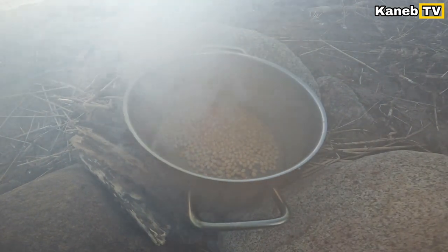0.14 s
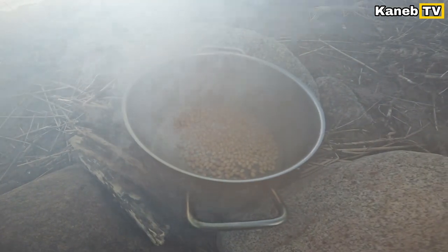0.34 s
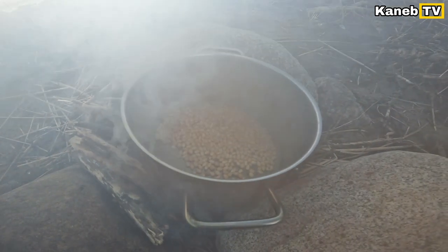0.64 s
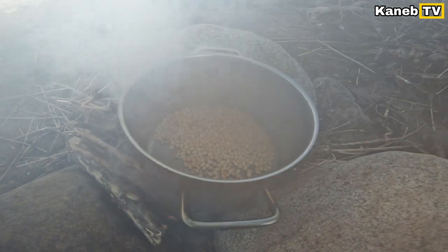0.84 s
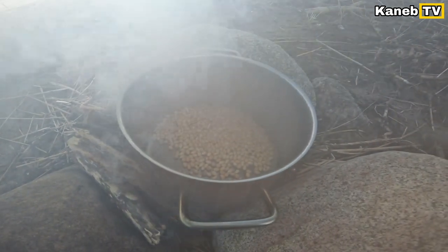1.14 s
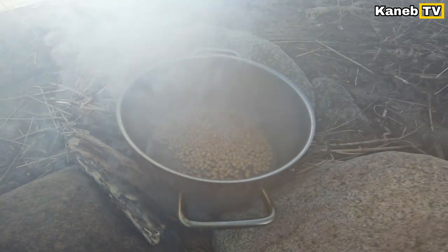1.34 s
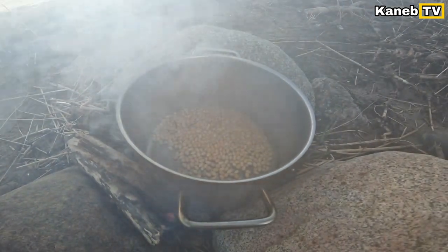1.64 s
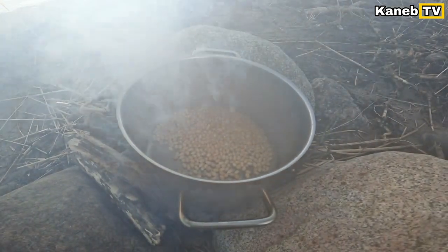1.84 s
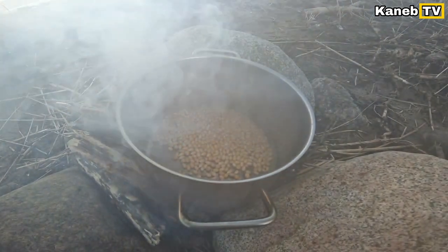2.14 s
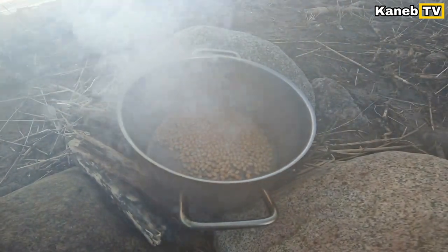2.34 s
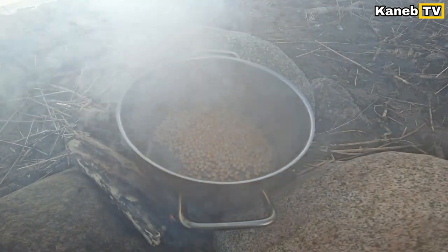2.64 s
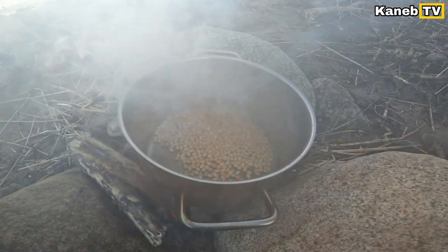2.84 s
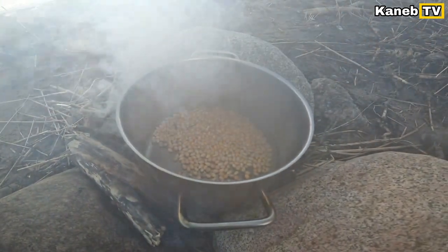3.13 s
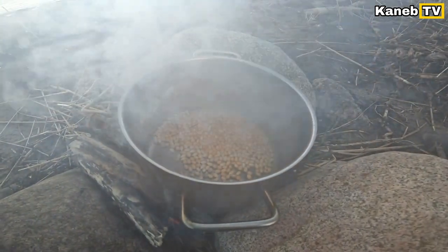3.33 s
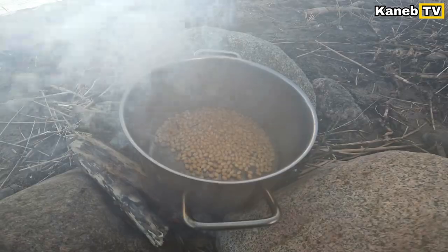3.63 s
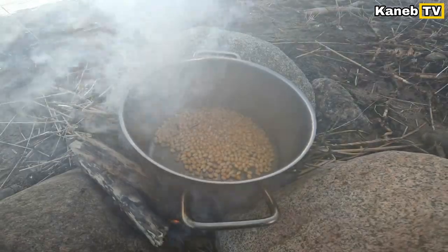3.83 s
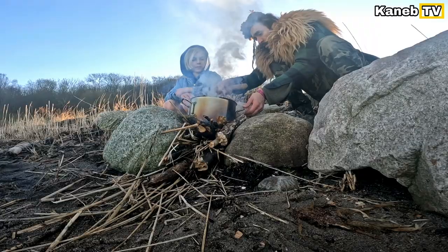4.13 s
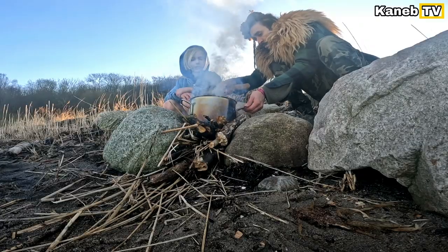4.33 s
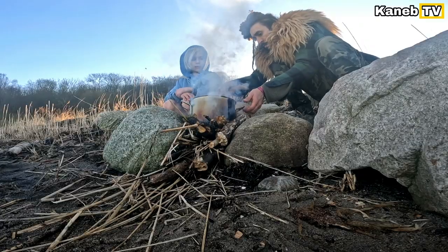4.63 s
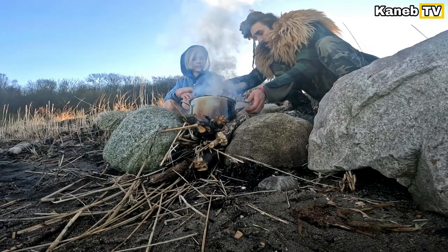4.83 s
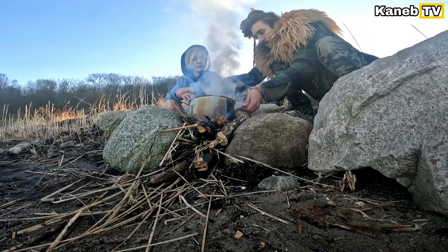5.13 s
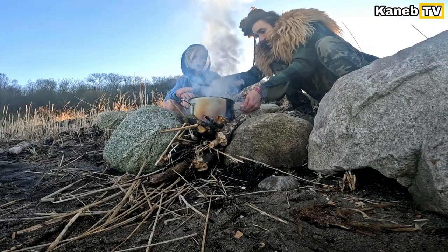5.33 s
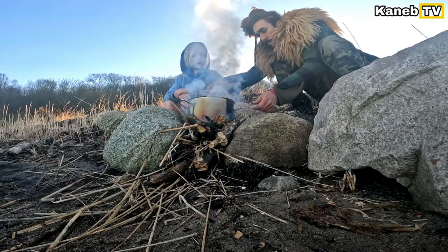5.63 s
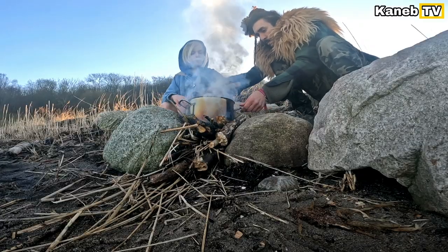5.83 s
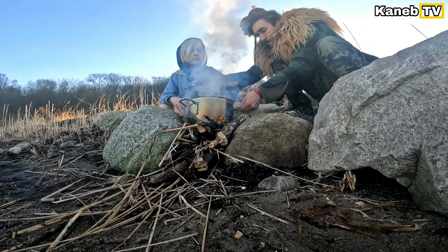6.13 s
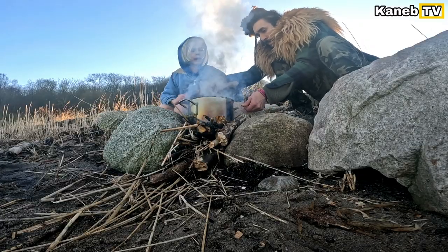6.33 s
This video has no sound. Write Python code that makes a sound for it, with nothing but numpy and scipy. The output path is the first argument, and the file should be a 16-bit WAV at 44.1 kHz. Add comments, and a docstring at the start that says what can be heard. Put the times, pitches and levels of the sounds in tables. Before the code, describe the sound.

From 0 to 4 seconds, food sizzles steadily close to the microphone in an open metal pot: a dense hiss of steam, snapping droplets and tiny ringing bubbles, slightly hollow, swelling a little near 1.3 seconds. Beneath it are a low fluttering campfire and soft wind buffets; small spits and wood cracks tick, notably between 2.1 and 2.8 and near 3.3. Just after 4 seconds the sound moves further off and the sizzle becomes faint, as the pot scrapes with a metallic groan. A light touch follows at 4.3, then a strong clank and squeal at 4.6. Quiet grating continues from 4.8 to 5.3, with slight sizzle flares at 4.5 and 5.3. A stone rocks dully at 5.36, then sharp ringing knocks come at 5.43 to 5.5. After a lull, a short rising croak and knock at 5.98 precede loud clanks and scraping at 6.1 to 6.2, ringing away into faint grating.

```python
"""Sizzling pot on a campfire

Food sizzles in a metal pot: impulses of bursting bubbles, ringing bubbles and steam noise, coloured by the pot.
Wind and flames are low turbulent noise; spits of fat and cracks of firewood are noise in single resonances.
After four seconds the sizzle is heard from further off, and the pot is shoved about on its hearth stones:
each shove is a knock and a run of stick-slip catches that ring the modes of its wall; some slips squeal.
A stone also rocks under the pot, and once the pot judders with a low croak."""
import sys
import numpy as np
from scipy import signal
from scipy.fft import rfft, irfft, next_fast_len
from scipy.io import wavfile
from scipy.ndimage import uniform_filter1d

SR = 44100
rng = np.random.default_rng(int(sys.argv[2]) if len(sys.argv) > 2 else 0)


def unload_audio(sound):
    """Save the sound as a 16-bit wav file, at the path given as the first command line argument."""
    columns = np.transpose(np.atleast_2d(sound))
    # keep every value between -1 and 1, then stretch to whole-number steps
    steps = np.round(np.clip(columns, -1, 1) * 32767)
    wavfile.write(sys.argv[1], SR, steps.astype(np.int16))


N = 285327

# spectrum of wind at the microphone: frequency_hz, relative_density_db (per Hz)
WIND_COLOUR = [(8.8, -31), (15, 2), (43, 0.5), (89, -8), (120, -18), (160, -92), (260, -120)]
# gusts, bell-shaped in power: centre_s, width_s (between the 1/e points), level_db
GUSTS = [(.275, 0.032, -29.5), (0.783, .07, -38), (1.93, 0.08, -30.5), (2.24, 0.38, -36),
         (2.679, 0.034, -27.5), (2.828, 0.053, -38), (3.232, 0.085, -33), (3.495, 0.034, -29)]
# spectrum of the flames: frequency_hz, relative_density_db (per Hz)
FLAME_COLOUR = [(50, -4.5), (90, 0.5), (175, -2), (280, -17.5), (520, -19), (800, -34.5), (1500, -69)]
# spits of fat and cracks of firewood at set times:
# start_s, relative_peak_db, centre_hz, half_width_hz (of one filter pass), noise_t60_s
SPITS = [(.054, -36, 2980, 1200, 0.059), (.84, -50, 530, 250, .036), (1.135, -47, 1330, 120, .035),
         (2.086, -30.5, 10900, 700, 0.015), (2.227, -41.5, 10740, 400, .014),
         (2.299, -35, 4800, 1200, .024), (2.729, -30, 5330, 1490, .02), (2.73, -39, 1800, 900, 0.023),
         (2.817, -40.5, 1400, 400, 0.051), (3.293, -43.5, 314, 90, 0.023), (3.39, -36, 3800, 400, .025),
         (6.436, -44.5, 5930, 1800, .023)]
# spectrum of the near sizzle without the pot's air: frequency_hz, relative_density_db (per Hz)
NEAR_COLOUR = [(500, -17.5), (850, -20), (1100, -10.5), (1620, -10.5), (2150, -8), (2900, -1.5),
               (4200, -2.5), (5000, 1), (7700, -1.5), (8100, -6.5), (9500, -12), (11300, -9.5),
               (13200, -18.5), (14500, -21)]
# spectrum of the distant sizzle: frequency_hz, relative_density_db (per Hz)
FAR_COLOUR = [(300, -7), (700, -10), (1500, 1.5), (3000, 6.5), (5000, 3), (7600, -0.5), (9000, -10.5),
              (12000, -7), (14500, -27.5)]
# shape of the sizzle's stereo width: frequency_hz, relative_side_to_mid_db
FRY_SIDE = [(60, -23), (110, -16), (200, -10), (370, 7), (680, 0), (1250, -9.5), (2290, -6), (4210, -6),
            (7720, -13), (14200, -10)]
# air resonances of the open pot: centre_hz, width_hz (at half the lift), lift_db
CAVITY = [(1273, 132, 13.5), (1932, 95, 11), (2284, 130, 7), (2634, 72, 9), (3200, 74, 6), (3800, 210, 4),
          (10600, 320, 4.5)]
# frying heard from above the pot: time_s, level_db
FRYING = [(0, -47.5), (1.3, -45), (2.4, -46.5), (4, -45)]
# food slides onto hot metal and the sizzle flares: centre_s, width_s (between the 1/e points), level_db
FLARES = [(4.52, 0.23, -54), (5.32, 0.18, -54)]
# strong vibration modes of the pot: frequency_hz, relative_energy_db, t60_s
POT = [(228, -12, .12), (510, -7, .15), (524, -3, .24), (690, -13, .14), (888, -17, .25), (1012, -11, .17),
       (1135, -9, .17), (1215, -13, .55), (1240, -7, .2), (1292, -8, .16), (1437, -16, .3),
       (1674, -24, .65), (1900, -15, .15), (2051, -19, .45), (2315, -20, .7), (2487, -12, .55),
       (2530, -11, .36), (2579, -13, .7), (2660, -6, .37), (2826, -16, .8), (2947, -7, .35), (3008, -7, .3),
       (3111, -4, .3), (3185, -4, .18), (3272, -4, .2), (3762, -11, .25), (3885, -8, .24), (4145, -10, .28),
       (4435, -10, .26), (5730, -16, .18)]
# crowd of weaker modes, also the colour of the contact cracks: frequency_hz, relative_level_db
SHELL = [(70, -2), (160, 0), (320, -8.5), (520, 4.5), (800, -7), (1280, -5), (1620, -13.5), (2200, -13),
         (3250, 3.5), (3700, -4), (4800, -6), (5400, -8), (7900, -13), (9000, -28), (14000, -29)]
# shoves: start_s, drag_length_s, knock_db, drag_db (both before the tilt), swell_db (over the drag),
# bass_tilt_db, treble_tilt_db
SHOVES = [(4.037, 0.033, -34.5, -28.5, 3.5, 2, 2.5), (4.07, 0.05, -36, -19.5, -0.5, 1.5, -9),
          (4.276, 0.052, -43.5, -51, 0, 0, -7), (4.504, .01, -41, -55, 0, -4.5, -24),
          (4.522, 0.011, -43, -59, 0, 0, 15), (4.58, .015, -34.5, -35.5, 0, -2, -9),
          (4.598, 0.046, -23, -22, 2, 1.5, -1.5), (4.792, 0.154, -47, -43.5, -1.5, 1.5, -1.5),
          (4.95, 0.083, -51, -45, 2, 7, -2), (5.124, .12, -49, -41, 5.5, 2.5, -23),
          (5.26, .1, -54, -45.5, 1.5, 5, -15), (5.427, 0.01, -21, -26.5, 0, -1, -7),
          (5.465, 0.052, -26.5, -23, -2, 0.5, 0), (5.981, 0.027, -30, -27, 2.5, 0, 3),
          (6.104, 0.02, -48, -34, -1, 0, .5), (6.132, 0.018, -19, -23.5, 0, -2, -0.5),
          (6.158, 0.068, -28, -22.5, 0, -0.5, -4.5), (6.331, 0.062, -52, -45.5, 0, 7, -13.5)]
# single modes of the pot set ringing, mostly by slips that groan or squeal, some by bumps of the stones:
# start_s, rise_s, pitch_hz, level_db (before panning)
SQUEALS = [(4.061, 0.038, 2660, -27.5), (4.065, 0.013, 526.6, -27), (4.28, 0.0076, 520, -40.5),
           (4.594, 0.0087, 1012, -28.5), (4.6, 0.025, 518.7, -30), (4.6, .013, 1128, -24),
           (4.615, 0.049, 3110, -21.5), (5.225, 0.042, 2660, -46.5), (5.35, .02, 522, -40),
           (5.475, 0.016, 3190, -26), (6.132, .003, 4435, -25.5), (6.133, .065, 3280, -31.5)]

TOP_HZ = 14000
MOVE_S, MOVE_LENGTH_S = 4.07, 0.2  # when the scene changes to a place further from the pot, and how long the crossfade takes
FFT_SIZE = next_fast_len(N)
TIME, FREQ = np.arange(N) / SR, np.arange(FFT_SIZE // 2 + 1) * SR / FFT_SIZE
RING_TIME = np.arange(SR) / SR
AWAY = np.clip((TIME - MOVE_S) / MOVE_LENGTH_S, 0, 1)  # 0 over the pot, 1 further off


def undb(db):
    """Logarithmic level: decibels become an amplitude gain."""
    return 10 ** (np.asarray(db) / 20)


def unit(x):
    """Mean power: scale to an rms of 1."""
    return x / np.sqrt(np.mean(x ** 2) + 1e-24)


def loudest(x):
    """Short-time power: scale so that the loudest 20 ms have an rms of 1."""
    power = np.mean(np.atleast_2d(x) ** 2, axis=0)
    return x / np.sqrt(uniform_filter1d(power, SR // 50).max())


def spectrum(points):
    """Logarithmic frequency: join (Hz, dB) points by straight lines on a log axis."""
    hz, db = np.transpose(points)
    return np.interp(np.log(FREQ + 1), np.log(hz), db)


def colour(x, db):
    """Linear filtering: apply a gain in dB at every frequency."""
    return irfft(rfft(x, FFT_SIZE) * undb(db), FFT_SIZE)[..., :N]


def lowpass_db(corner_hz):
    """Low-pass response in dB, smooth around its corner."""
    return -20 * np.log10(1 + (FREQ / corner_hz) ** 4)


def walk(rate_hz):
    """Random modulation: low-passed noise with an rms of 1."""
    return unit(colour(rng.standard_normal(N), lowpass_db(rate_hz)))


def delay(x, seconds):
    """Interaural lag: a phase shift proportional to frequency."""
    return irfft(rfft(x, FFT_SIZE) * np.exp(-2j * np.pi * FREQ * seconds), FFT_SIZE)[:N]


def add(out, start_s, sound):
    """Superposition: mix a sound in at a time."""
    start = max(int(start_s * SR), 0)
    out[..., start:start + sound.shape[-1]] += sound[..., :N - start]


def fade(t, t60):
    """Exponential free decay, 60 dB in t60 seconds."""
    return np.exp(-np.log(1000) * t / t60)


def steady(near_db, far_db):
    """Level against distance: a gain that only changes while the scene shifts further from the pot."""
    return undb(near_db + (far_db - near_db) * AWAY)


def swells(base, rows):
    """Power addition: bell-shaped swells join a base gain."""
    power = base ** 2
    for centre_s, width_s, db in rows:
        power = power + undb(db) ** 2 * np.exp(-(2 * (TIME - centre_s) / width_s) ** 2)
    return np.sqrt(power)


def bursts(rate_hz, spread_db):
    """Random impulse train: many faint bursts, a few strong."""
    size = undb(spread_db * np.minimum(rng.exponential(size=N), 6))
    happens = rng.random(N) < rate_hz / SR
    return unit(happens * size * rng.choice([-1, 1], N))


def pops(rows):
    """Damped resonance: short noise bursts, each dying away in one broad band."""
    out = np.zeros(N)
    t = RING_TIME[:SR // 5]
    for start_s, peak_db, hz, half_width_hz, t60 in rows:
        band = signal.iirpeak(hz, hz / (2 * half_width_hz), fs=SR)
        burst = rng.standard_normal(len(t)) * fade(t, t60)
        for _ in range(2):
            burst = signal.lfilter(*band, burst)
        add(out, start_s, burst / np.abs(burst).max() * undb(peak_db))
    return out


def rumble(points, gain, side_db, pan_db, puff_db):
    """Turbulence: low noise with sudden small puffs, much alike in both ears."""
    layers = []
    for _ in range(2):
        air = rng.standard_normal(N) + undb(puff_db) * bursts(120, 3.44)
        layers.append(unit(colour(air, spectrum(points))))
    mid, side = layers[0], layers[1] * undb(side_db)
    return np.array([(mid + side) * undb(pan_db), (mid - side) * undb(-pan_db)]) * gain


def wind():
    """Turbulent pressure on the microphone: a wandering breeze with gusts."""
    breeze = steady(near_db=-43.5, far_db=-52) * undb(1.5 * walk(4.8))
    return rumble(WIND_COLOUR, swells(breeze, GUSTS), side_db=-17, pan_db=-1.7, puff_db=-20)


def flames():
    """Turbulent combustion: a fluttering low rumble with many puffs."""
    draught = steady(near_db=-51, far_db=-50) * undb(0.5 * walk(8.4))
    return rumble(FLAME_COLOUR, draught, side_db=-19.5, pan_db=0.0, puff_db=-3.5)


def spits(near_db=-43.5, far_db=-54.5, spread_db=2.5, low_hz=2000, octaves=2.6, width=0.11, t60=.018, count=24):
    """Impulsive sources: spits and cracks at set times, and others scattered in time and pitch."""
    when, pitch, size = rng.random((count, 3)).T
    starts = when * TIME[-1]
    hz = np.minimum(low_hz * 2 ** (octaves * pitch), TOP_HZ)
    db = np.interp(starts, [MOVE_S, MOVE_S + MOVE_LENGTH_S], [near_db, far_db]) + spread_db * (2 * size - 1)
    scattered = [(s, d, f, width * f, t60) for s, d, f in zip(starts, db, hz)]
    return pops(SPITS) * undb(3) + pops(scattered)


def bubbles(rate_hz, spread_db):
    """Bubble resonance: each bubble in the fat rings for a few milliseconds at its own pitch."""
    out, t = np.zeros(N + 256), RING_TIME[:256]
    when, pitch, size = rng.random((int(rate_hz * N / SR), 3)).T[:, :, None]
    hz = 1500 + 12500 * pitch
    level = np.sqrt(hz) * undb(spread_db * np.minimum(-np.log(size), 5))
    rings = np.sin(2 * np.pi * hz * t) * fade(t, t60=t[-1]) * level
    np.add.at(out, (when * N).astype(int) + np.arange(len(t)), rings)
    return unit(out[:N])


def sizzle(shape_db, rate_hz, spread_db, steam_db, bubble_db, side_db=-2.0, lag_s=1.2e-5):
    """Boiling noise: snapping droplets and ringing bubbles over a hiss of steam."""
    layers = []
    for _ in range(2):
        ringing = undb(bubble_db) * bubbles(rate_hz=1200, spread_db=3.5)
        snapping = bursts(rate_hz, spread_db)
        steam = undb(steam_db) * rng.standard_normal(N)
        layers.append(unit(colour(snapping + ringing + steam, shape_db)))
    mid, side = layers[0], colour(layers[1], spectrum(FRY_SIDE) + side_db)
    both = np.array([delay(mid + side, lag_s), mid - side])
    # the fine spray at the top comes and goes apart from the coarser bubbling
    coarse = colour(both, lowpass_db(7000))
    spray = both - coarse
    return coarse * undb(.6 * walk(16)) + spray * undb(1.3 * walk(18))


def frying():
    """Cavity resonance and distance: the sizzle from over the pot's mouth, then faint from the side."""
    cavity_db = sum(lift / (1 + (2 * (FREQ - hz) / width) ** 2) for hz, width, lift in CAVITY)
    near = sizzle(spectrum(NEAR_COLOUR) + cavity_db, rate_hz=6000, spread_db=1.5, steam_db=0.5, bubble_db=-5.5)
    far = sizzle(spectrum(FAR_COLOUR), rate_hz=1100, spread_db=3.0, steam_db=3.5, bubble_db=-1.5)
    near_gain = undb(np.interp(TIME, *np.transpose(FRYING)))
    far_gain = swells(undb(-62), FLARES)
    return near * near_gain * (1 - AWAY) ** 2 + far * far_gain * AWAY


def stones(start_s=5.363, length_s=.05, gap_s=.0175, peak_db=-30, first_hz=240, sag_oct_per_s=4):
    """Repeated impact: a hearth stone rocks in a quick run of bumps, each lower than the last."""
    ages = np.arange(0, length_s, gap_s)
    centres = first_hz * 2 ** (-sag_oct_per_s * ages)
    return pops([(start_s + age, peak_db, hz, 0.38 * hz, 0.11) for age, hz in zip(ages, centres)])


def judder(start_s=5.982, length_s=0.061, level_db=-29.5, from_hz=215, to_hz=311, octave_db=-3.5, attack_s=0.0054):
    """Regular stick-slip: a short low croak that rises in pitch and fades as the pot gathers speed."""
    out, t = np.zeros(N), RING_TIME[:int(length_s * SR)]
    progress = t / length_s
    catch_hz = from_hz + (to_hz - from_hz) * progress ** 2
    phase = 2 * np.pi * np.cumsum(catch_hz) / SR
    tone = np.sin(phase) + undb(octave_db) * np.sin(2 * phase)
    croak = tone * np.minimum(t / attack_s, 1) * (1 - progress ** 2)
    add(out, start_s, loudest(croak) * undb(level_db))
    return out


def pot_modes(crowd_db=-2.5, crowd_t60=0.16, scatter_db=0.5, life_spread=0.56, count=260):
    """Modal vibration: the pot's strong free modes and a crowd of weak ones, with their gains."""
    hz, db, t60 = np.transpose(POT)
    shell_hz, shell_db = np.transpose(SHELL)
    place, size, life = rng.standard_normal((count, 3)).T
    # the modes of a shell lie ever further apart towards the top
    crowd_hz = np.interp(np.arange(count) + .3 * place, [0, 45, 170, count], [70, 1500, 5500, 11000])
    crowd = undb(np.interp(np.log(crowd_hz), np.log(shell_hz), shell_db) + scatter_db * size)
    # the food damps the low modes, the metal itself the highest
    damping = .45 + 250 / (crowd_hz + 200) + crowd_hz / 9000
    lives = crowd_t60 * np.exp(life_spread * life) / damping
    strong = undb(db)
    crowd *= np.linalg.norm(strong) / np.linalg.norm(crowd) * undb(crowd_db)
    hz, t60 = np.r_[hz, crowd_hz][:, None], np.r_[t60, lives][:, None]
    # the root of the decay time makes each gain set the mode's energy
    modes = np.sin(2 * np.pi * hz * RING_TIME) * fade(RING_TIME, t60) / np.sqrt(t60)
    return modes, np.r_[strong, crowd]


def pot_ring(modes, gains, contact_db=3.5, mode_pan_db=1.5):
    """Impulse response by modal sum: every contact point weights the modes anew."""
    weight, pan, sign = rng.standard_normal((len(gains), 3)).T
    ear_db = contact_db * weight + mode_pan_db * pan * np.array([[1], [-1]])
    return (gains * np.sign(sign) * undb(ear_db)) @ modes


def drag(length_s, swell_db, catch_hz=560, spread_db=10, grip_db=4, release_s=.012):
    """Stick-slip on gritty stone: irregular catches, a grip that comes and goes, and a quick end."""
    t = RING_TIME[:SR // 3]
    force = undb(spread_db * rng.uniform(-0.97, 1, len(t))) * rng.choice([-1, 1], len(t))
    catches = (rng.random(len(t)) < catch_hz / SR) * force
    grip = np.interp(t, np.linspace(0, t[-1], 20), rng.uniform(-0.46, 1, 20))
    push_db = swell_db * np.minimum(t / length_s, 1)
    release = np.exp(-np.maximum(t - length_s, 0) / release_s)
    return catches * undb(grip_db * grip + push_db) * release


def shoves(bass_hz=1700, treble_hz=4200, crack_db=2.0, crack_t60=0.018):
    """Impact and friction by convolution: knocks and drags excite the pot's modes."""
    out = np.zeros((2, N))
    modes, gains = pot_modes()
    grit = unit(colour(rng.standard_normal(N), spectrum(SHELL)))
    freq = np.arange(SR // 2 + 1)
    for start_s, length_s, knock_db, drag_db, swell_db, bass_db, treble_db in SHOVES:
        crack = grit[rng.integers(N - SR):][:SR] * fade(RING_TIME, crack_t60)  # metal meets stone
        ring = loudest(pot_ring(modes, gains)) + undb(crack_db) * crack
        scrape = irfft(rfft(ring) * rfft(drag(length_s, swell_db), SR), SR)
        sound = loudest(ring) * undb(knock_db) + loudest(scrape) * undb(drag_db)
        # a broad contact favours the low modes, a sharp edge the high ones
        bass_tilt = bass_db / (1 + (freq / bass_hz) ** 6)
        treble_tilt = treble_db * (1 - 1 / (1 + (freq / treble_hz) ** 8))
        tilted = irfft(rfft(sound) * undb(bass_tilt + treble_tilt), SR)
        add(out, start_s, tilted[:, :SR * 9 // 10])
    return out


def squeals(t60=0.18, rough_rad=0.24):
    """Single-mode ringing: a slip locked to one mode, or a bump, makes a groan or squeal with a wavering phase
    that builds up, then rings away."""
    out = np.zeros(N)
    waver = walk(150)
    for start_s, rise_s, hz, db in SQUEALS:
        swell = np.minimum(RING_TIME / rise_s, 1) * fade(np.maximum(RING_TIME - rise_s, 0), t60)
        wobble = rough_rad * waver[rng.integers(N - SR):][:SR]
        tone = np.sin(2 * np.pi * hz * RING_TIME + wobble)
        add(out, start_s, loudest(swell * tone) * undb(db))
    return out


def pot():
    """Stereo localisation by lag and level: the ringing pot stands a little to the right."""
    left, right = shoves() + squeals()
    return np.array([delay(left, 1 / SR) * undb(-.4), right * undb(.4)])


def scene():
    """Superposition of wind, fire, food and pot in the open air."""
    background = wind() + flames() + spits()
    return background + frying() + stones() + judder() + pot()


def record(dry):
    """Band limiting: an elliptic low-pass by which the recorder cuts the top."""
    return signal.sosfilt(signal.ellip(8, .2, 70, TOP_HZ, fs=SR, output="sos"), dry)


dry = scene()
out = record(dry)
unload_audio(out)
```